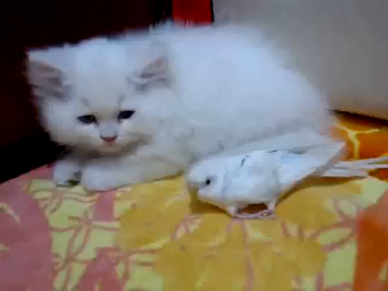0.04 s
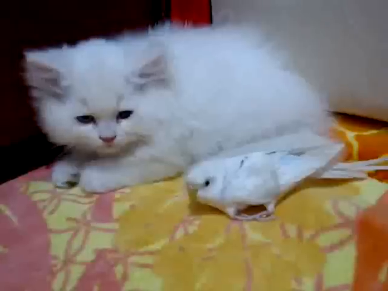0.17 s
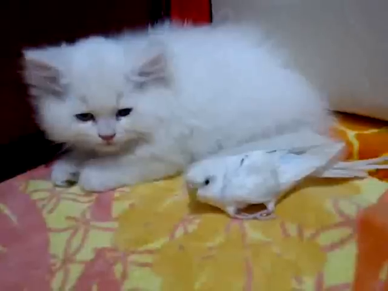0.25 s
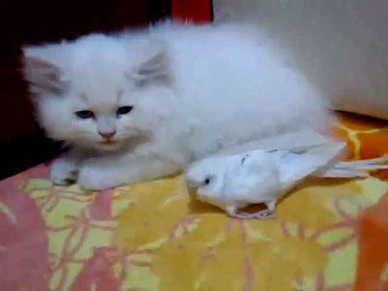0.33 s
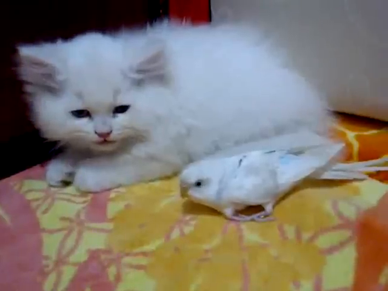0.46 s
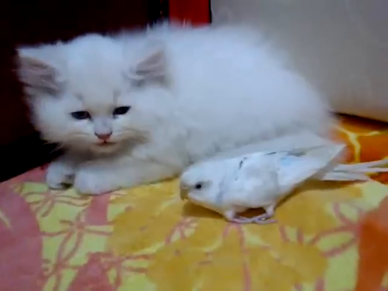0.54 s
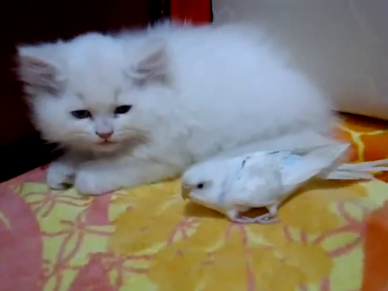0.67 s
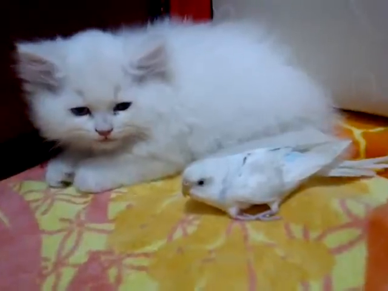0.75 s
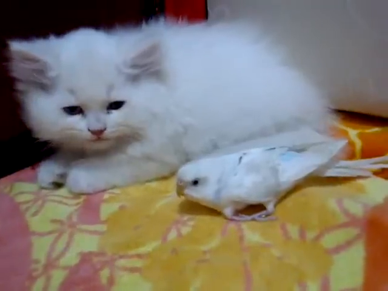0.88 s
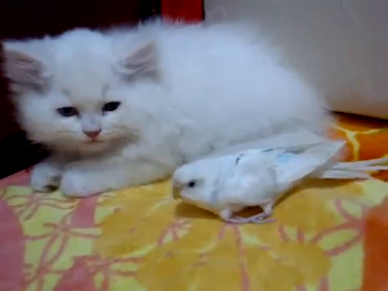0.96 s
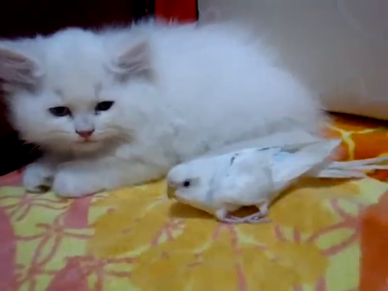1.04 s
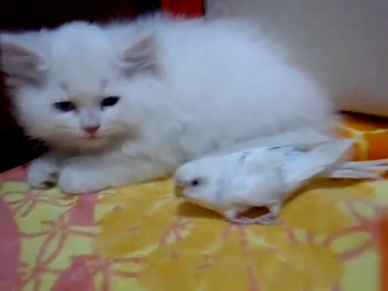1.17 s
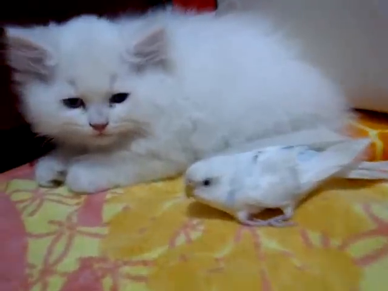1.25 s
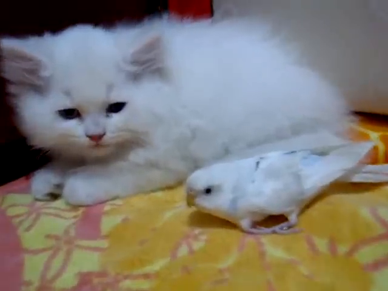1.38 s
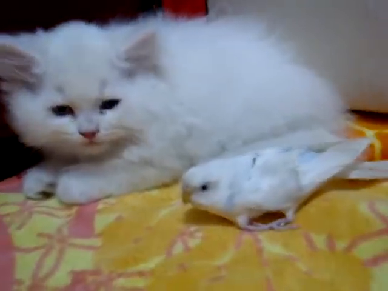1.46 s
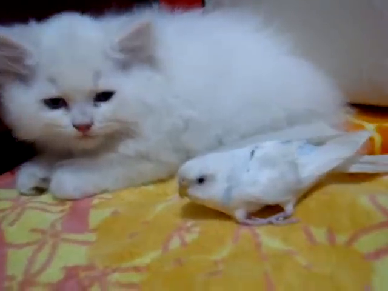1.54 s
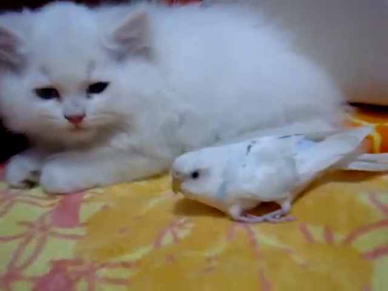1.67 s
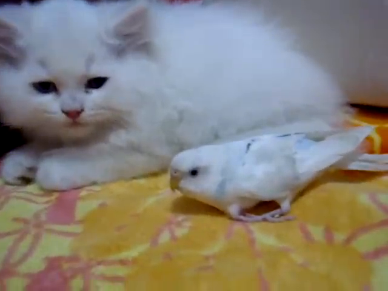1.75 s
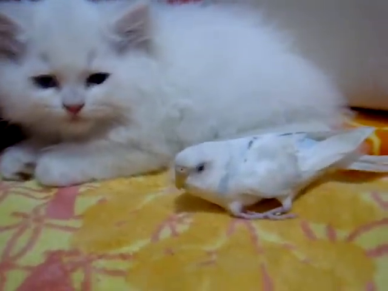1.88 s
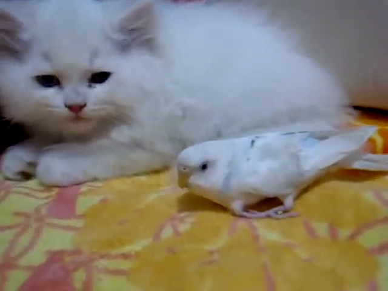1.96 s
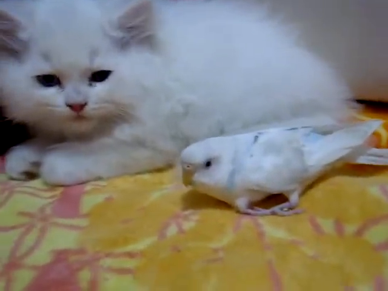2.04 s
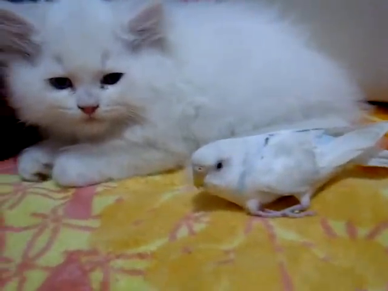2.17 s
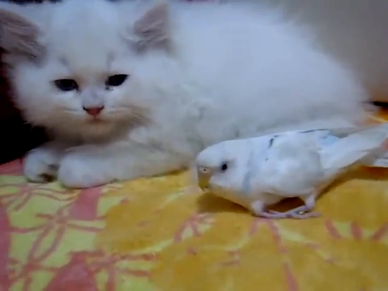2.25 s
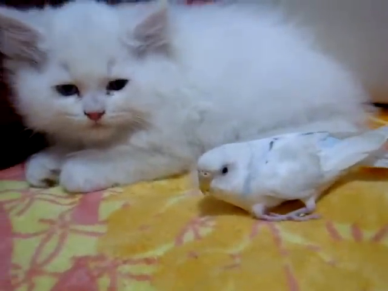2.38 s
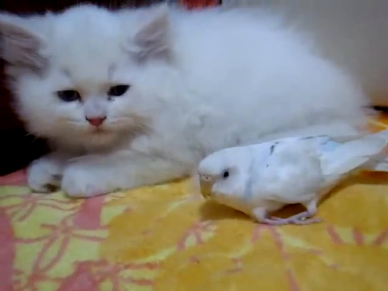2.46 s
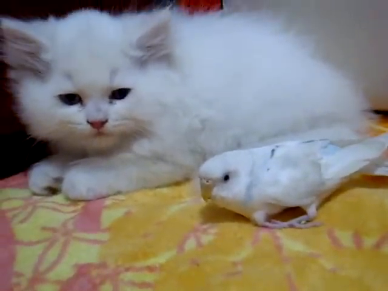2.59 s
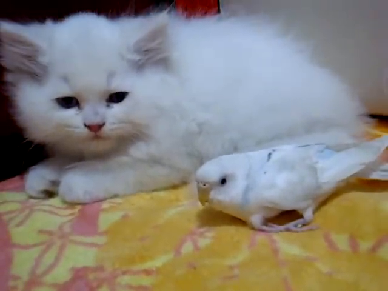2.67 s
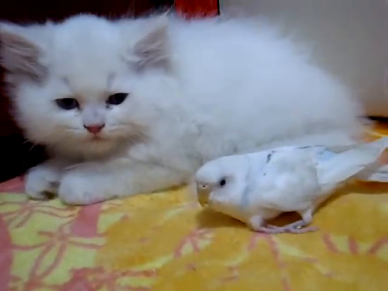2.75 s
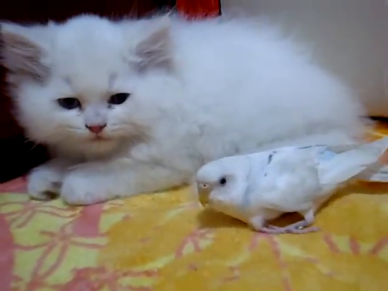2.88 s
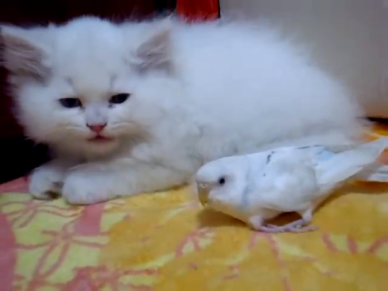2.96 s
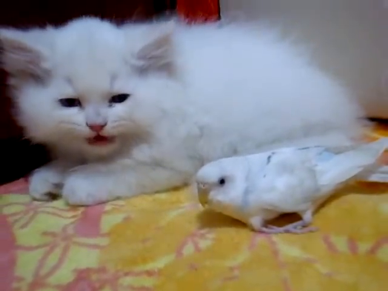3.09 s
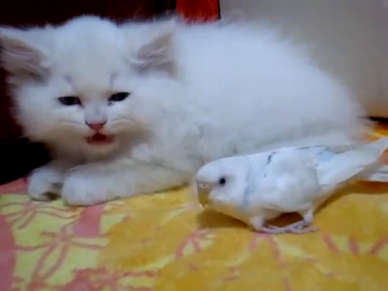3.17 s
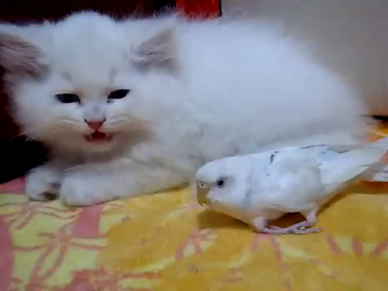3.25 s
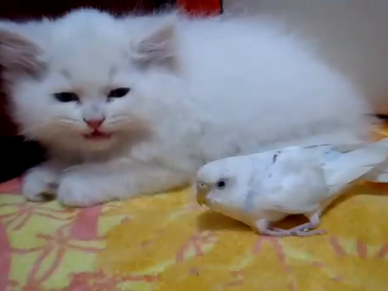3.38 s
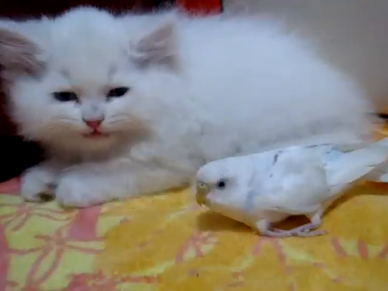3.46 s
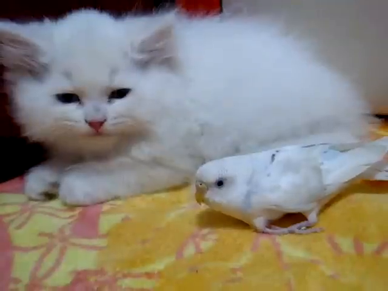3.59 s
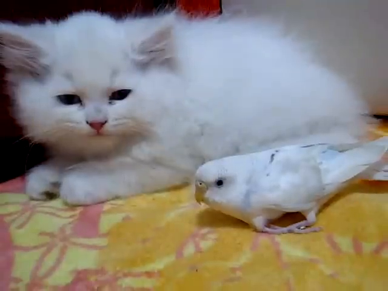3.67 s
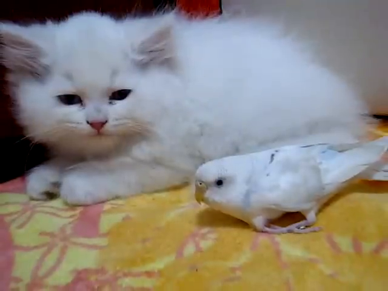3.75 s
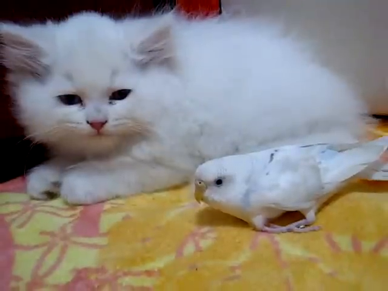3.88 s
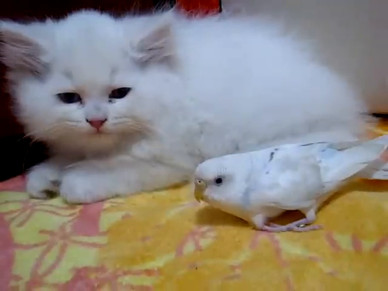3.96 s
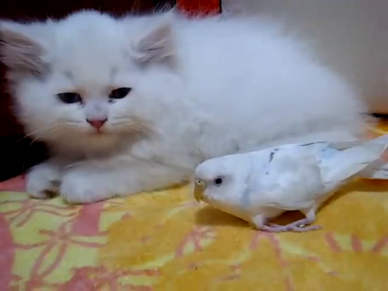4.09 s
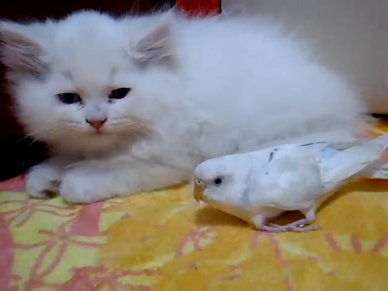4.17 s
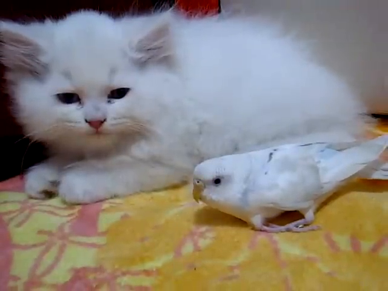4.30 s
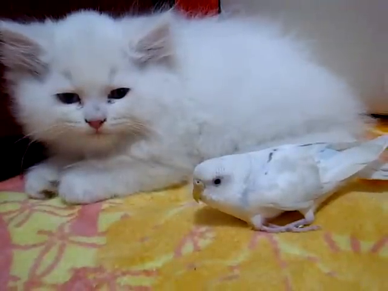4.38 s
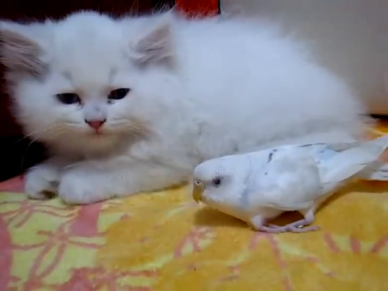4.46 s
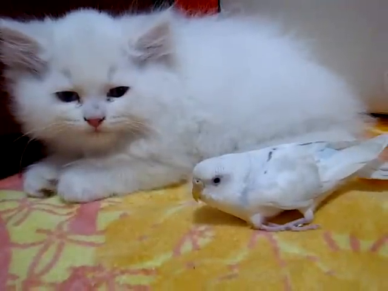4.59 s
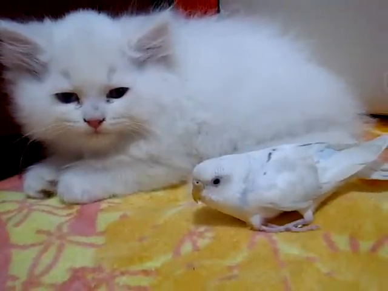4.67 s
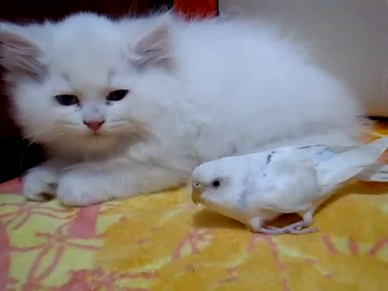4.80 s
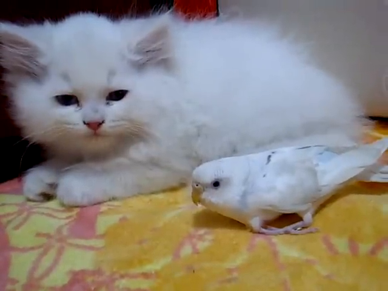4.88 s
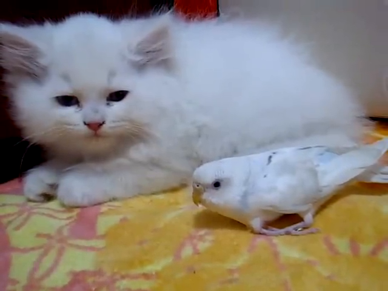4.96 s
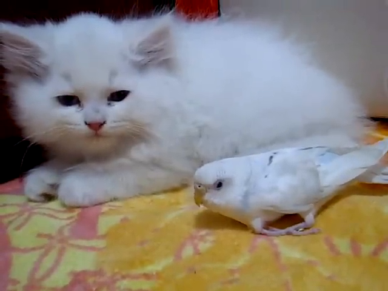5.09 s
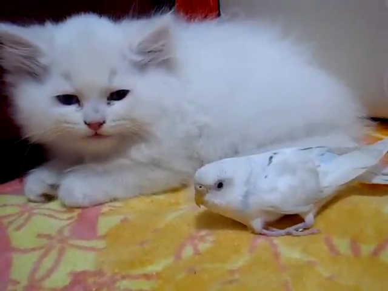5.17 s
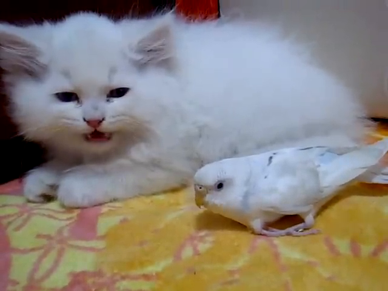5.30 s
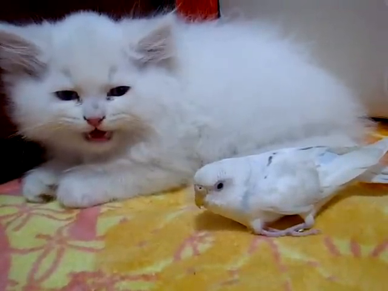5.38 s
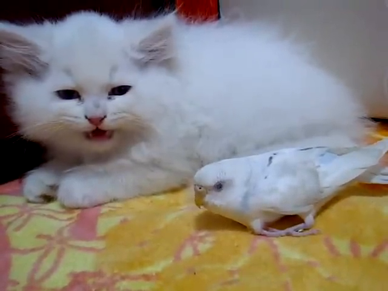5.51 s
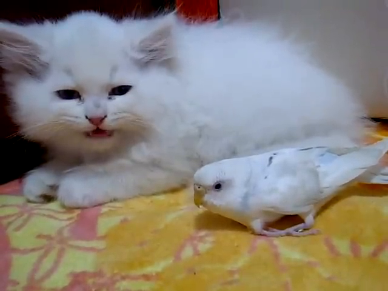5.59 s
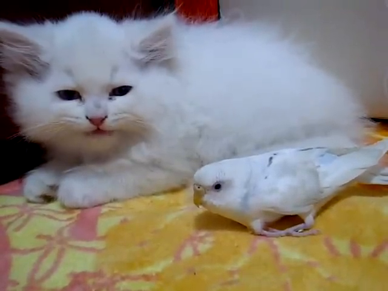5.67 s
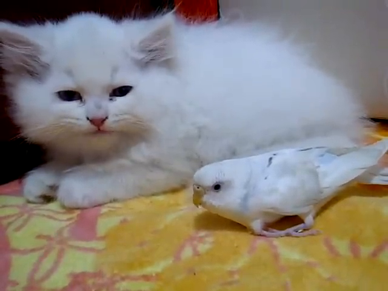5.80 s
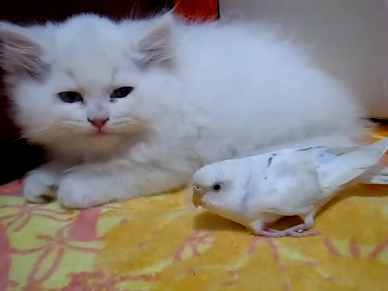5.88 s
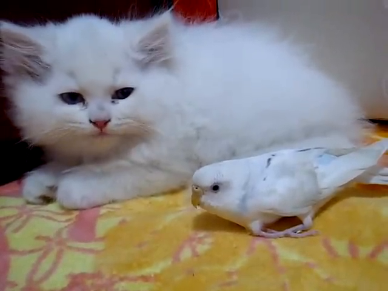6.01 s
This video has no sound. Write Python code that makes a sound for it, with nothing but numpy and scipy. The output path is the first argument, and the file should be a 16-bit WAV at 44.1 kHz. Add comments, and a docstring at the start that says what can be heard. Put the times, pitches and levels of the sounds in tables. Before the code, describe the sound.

Silence until 0.16 s, when the microphone switches on with a loud, clipped double-snap pop. From there a low room rumble, soft hiss, unsteady hum and very faint high whine continue to the end. At 0.47-0.99 s a kitten gives a weak, quivering mew, nearly a pure tone around 1 kHz, sagging in pitch at its close. Soft cloth rustle begins near 1.1 s; small plastic ticks cluster at 1.2-1.6 s, then sharper ones at 1.8-2.1 s, with a strong dull knock at 1.97 s and a bright ringing click at 2.08 s. Rustling fades, with tiny ticks at 2.4 s. A hard, loud knock lands at 2.88 s, then a small double tick at 3.05 s. A firmer mew runs 3.1-3.67 s, scooping up quickly, then falling. Quiet room follows until the last, strongest mew at 5.37-5.89 s, falling steeply. Close, boxy sound with little room tail.

```python
"""A microphone switches on with a pop: two snaps, one big swing and a decaying offset, clipped at the input.
A kitten then gives three falling mews: trembling, nearly pure tones with weak overtones.
Between the first two, cloth rustles (shaped noise) and fingers tick and knock on a camera's case (damped case
modes, single damped blows), with short noise bursts close to some knocks.
Throughout lie room rumble and hiss (shaped noise), unsteady hum tones and a comb of faint whine lines."""
import sys
import numpy as np
from scipy import signal
from scipy.fft import rfft, irfft
from scipy.io import wavfile
from scipy.ndimage import uniform_filter1d

SR = 44100
rng = np.random.default_rng(int(sys.argv[2]) if len(sys.argv) > 2 else 0)


def log_audio(samples):
    """Write samples as a 16-bit WAV file to the path given in sys.argv[1]."""
    # one column per channel
    frames = np.atleast_2d(samples).T
    # limit to full scale, then quantise
    limited = np.clip(frames, -1, 1)
    pcm = np.round(limited * 32767).astype(np.int16)
    wavfile.write(sys.argv[1], SR, pcm)


N = 266319
T = np.arange(N) / SR
SWITCH_ON_S = 0.158


def gain_of(db):
    """Decibels to amplitude."""
    return 10 ** (np.asarray(db) / 20)


def evened(x):
    """Scales to an rms of one."""
    return x / np.sqrt(np.mean(np.abs(x) ** 2) + 1e-20)


def add(mix, start_s, sound):
    """Mixes a sound in at start_s, cut at the end of the mix."""
    part = mix[round(start_s * SR):][:len(sound)]
    part += sound[:len(part)]


def noise(points):
    """Gaussian noise of unit rms, its spectrum interpolated over log frequency from (f/Hz, level/dB) points."""
    hz, db = np.transpose(points)
    bin_hz = np.fft.rfftfreq(N, 1 / SR)
    shape_db = np.interp(np.log(bin_hz + 1), np.log(hz + 1), db)
    spectrum = rfft(rng.standard_normal(N))
    return evened(irfft(spectrum * gain_of(shape_db), N))


def drift(rate_hz):
    """Random wandering of unit rms: white noise low-passed at about rate_hz."""
    hz = np.fft.rfftfreq(N, 1 / SR)
    spectrum = rfft(rng.standard_normal(N))
    return evened(irfft(spectrum / (1 + (hz / rate_hz) ** 2), N))


def room(x, t60_s=0.22):
    """Short, soft tail of a furnished room: decaying noise of unit energy after a 4 ms gap."""
    t = np.arange(SR // 2) / SR
    tail = rng.standard_normal(len(t)) * gain_of(-60 * t / t60_s) * (t > 0.004)
    return signal.fftconvolve(x, tail / np.linalg.norm(tail))[:N]


def room_floor():
    """Room rumble and hiss: one shaped noise with a slowly wavering level."""
    # rumble and hiss spectrum: f/Hz, density/dB per Hz
    floor_colour = [(15, -17.5), (45, -5), (70, -9.5), (110, -5.5), (170, -2), (300, -3), (550, -5.5),
                    (900, -8), (1400, -12.5), (2000, -16), (3000, -20.5), (4300, -17.5), (7000, -18),
                    (9000, -24.5)]
    floor_db, waver_db = -58.96, 0.59
    return gain_of(floor_db) * noise(floor_colour) * gain_of(waver_db * drift(5.6))


def hum():
    """Steady room tones whose amplitude and phase waver through a complex random factor."""
    # tones: f/Hz, rms level/dB, unsteadiness/share of the tone
    tones = [(100.2, -70, 0.44), (152.3, -69, 0.86), (788, -77.5, 0.94)]
    out = np.zeros(N)
    for hz, db, unsteady in tones:
        waver = 1 + unsteady * (drift(4) + 1j * drift(8.8))
        carrier = np.exp(2j * np.pi * hz * T)
        out += gain_of(db) * evened((waver * carrier).real)
    return out


def whine():
    """Faint electronic whine: equal high harmonics of one low pitch, in random phase."""
    base_hz, line_rms_db = 268.1, -85.5
    lines = np.zeros(N)
    for order in range(15, 27):
        cycles = order * base_hz * T + rng.random()
        lines += np.sqrt(2) * np.sin(2 * np.pi * cycles)
    return gain_of(line_rms_db) * lines


def rustle(grain_db=0.5):
    """Soft, grainy rustle of cloth: shaped noise whose level rises and falls linearly in dB."""
    # cloth spectrum: f/Hz, density/dB per Hz
    cloth_colour = [(100, -16), (700, 2), (1400, -1), (2400, -2), (3500, -7.5), (8000, -18.5)]
    # shifts of the camera: peak t/s, peak level/dB, rise/s per 20 dB, fade/s per 20 dB
    shifts = [(1.14, -62.5, 0.088, 0.12), (2.0, -60.5, 0.15, 0.45)]
    level = np.zeros(N)
    for peak_s, db, rise_s, fade_s in shifts:
        distance = np.maximum((peak_s - T) / rise_s, (T - peak_s) / fade_s)
        level += gain_of(db - 20 * distance)
    return noise(cloth_colour) * level * gain_of(grain_db * drift(80))


def switch_pop(swing_at_s=0.16166, swing_db=-3.0, swing_hz=462,
               rebound_db=-19.5, rebound_s=0.0018, rebound_width_s=0.0011,
               offset_db=-50, settle_s=0.05, snap_db=-18, snap_decay_s=0.00023):
    """The microphone wakes: two decaying snaps around a large swing, a rebound, an offset creeping to zero."""
    t = T - swing_at_s
    snaps = np.zeros(N)
    for at_s in (SWITCH_ON_S, swing_at_s + 0.0007):
        snaps += (T > at_s) * np.exp(-abs(T - at_s) / snap_decay_s)
    u = (np.pi * swing_hz * t) ** 2
    swing = (2 * u - 1) * np.exp(-u)
    rebound = np.exp(-((t - rebound_s) / rebound_width_s) ** 2)
    offset = (t > 0) * np.exp(-abs(t) / settle_s)
    upward = gain_of(snap_db) * snaps + gain_of(swing_db) * swing
    return upward - gain_of(rebound_db) * rebound - gain_of(offset_db) * offset


def noise_bursts():
    """Brief gated noise bursts close to some knocks, each with one dull and one bright part."""
    # bursts: start t/s, length/s, dull level/dB, bright level/dB, fall by the end/dB (negative = rise)
    bursts = [(1.972, 0.0199, -48.5, -47, -3.5), (2.077, 0.026, -49.5, -61, 12),
              (2.877, 0.026, -39, -59, 6.5)]
    # dull part: f/Hz, density/dB per Hz
    dull_colour = [(60, 0), (200, 7), (900, -4), (2400, -1.5), (3300, -12), (7000, -16), (9000, -46)]
    # bright part: f/Hz, density/dB per Hz
    bright_colour = [(500, -37), (3600, -18), (4300, 2.5), (4700, -16), (5300, 3.5), (5800, -11),
                     (6300, -11), (9000, -20)]
    out, dull, bright = np.zeros(N), noise(dull_colour), noise(bright_colour)
    for start_s, length_s, dull_db, bright_db, fall_db in bursts:
        u = np.clip((T - start_s) / length_s, 0, 1)
        gate = np.minimum(1, 10 * np.minimum(u, 1 - u))
        burst = gain_of(dull_db) * dull + gain_of(bright_db) * bright
        out += gate * gain_of(-fall_db * u) * burst
    return out


def bass_roll_off(x, corner_hz, damping):
    """The microphone cannot hold a steady push: a second-order high-pass makes every push swing back."""
    w = 2 * np.pi * corner_hz
    return signal.lfilter(*signal.bilinear([1, 0, 0], [1, damping * w, w * w], SR), x)


def knocks():
    """Blows reaching the microphone through the case: damped sines, bass-limited so that they swing back."""
    # blows: t/s, peak level/dB, blow f/Hz, damping/per radian, swing-back f/Hz
    blows = [(1.4053, -38, 400, 0.52, 205), (1.8560, -46, 150, 0.82, 180), (1.8591, -39.5, 129, 0.28, 179),
             (1.9664, -17.5, 490, 0.96, 175), (2.0790, -40, 1810, 0.093, 205),
             (2.079, -28, 3860, 0.048, 205), (2.0873, -43.5, 348, 0.3, 205), (2.8811, -20, 604, 0.92, 330),
             (2.8813, -9, 1960, 0.32, 266)]
    out, t = np.zeros(N), np.arange(SR // 20) / SR
    for start_s, peak_db, blow_hz, loss, mount_hz in blows:
        angle = 2 * np.pi * blow_hz * t
        blow = np.sin(angle) * np.exp(-loss * angle)
        push = bass_roll_off(blow, mount_hz, damping=0.85)
        add(out, start_s, -gain_of(peak_db) * push / abs(push).max())
    return out


def ticks(lag_s=0.00025, room_db=-15, low_hz=2500):
    """Each tick rings the plastic case's modes for milliseconds; the small shell gives off little bass."""
    # taps: t/s, peak level/dB, pitch/factor on the modes
    taps = [(1.207, -45, 0.85), (1.378, -28.5, 0.96), (1.403, -35.5, 0.9), (1.440, -34, 0.97),
            (1.4614, -31, 0.91), (1.527, -39, 0.73), (1.568, -32, 0.89), (1.8256, -25.5, 0.97),
            (1.861, -34.5, 0.91), (1.886, -36, 0.82), (1.902, -42, 1), (1.966, -18.5, 0.87),
            (2.0786, -32, 1), (2.158, -45, 0.48), (2.407, -42, 0.88), (2.4145, -38.5, 0.88),
            (3.045, -37, 1.03), (3.048, -39, 0.97)]
    # modes of the plastic case: f/Hz, relative level/dB, t60/s
    case_modes = [(2680, -10, 0.01), (3430, -1.5, 0.006), (4360, 3.5, 0.0058), (4930, 5.5, 0.0087),
                  (5700, 8, 0.006), (6340, -2.5, 0.016)]
    out, t = np.zeros(N), np.arange(SR // 20) / SR
    for start_s, peak_db, pitch in taps:
        tick = np.zeros(len(t))
        for hz, mode_db, t60_s in case_modes:
            tick += gain_of(mode_db - 60 * t / t60_s) * np.sin(2 * np.pi * hz * pitch * t)
        tick = signal.lfilter(*signal.butter(4, low_hz * pitch, "high", fs=SR), tick)
        add(out, start_s + lag_s, gain_of(peak_db) * tick / abs(tick).max())
    return out + gain_of(room_db) * room(out, t60_s=0.11)


def mew(start_s, length_s, db, base_hz, scoop_hz, scoop_s, fall_hz, lateness, break_s, jump_hz, flick,
        octave_db, octave_change_db, third_db, release_s, tuning, tremble, shimmer_db=0.54):
    """A trembling tone with weak overtones: it scoops up, falls ever faster and breaks upward once."""
    # fundamental's gain as it glides through the resonances: f/Hz (before tuning), gain/dB
    voice_colour = [(800, -4), (850, -2.5), (890, 0), (935, -0.5), (972, -5), (1020, -3), (1070, -4),
                    (1120, -6)]
    break_width_s, flick_s, attack_s = 0.011, 0.01196, 0.009
    push_db, push_s = 2, 0.03  # extra effort at the start
    sag_db = -1.3  # change of the fundamental by the end
    calming = 0.5  # share of the tremble gone by the end
    throat_hz, throat_width_hz = 2700, 150  # resonance that picks out the third harmonic
    t = np.arange(0, length_s, 1 / SR)
    u = t / length_s

    voice_break = (1 + np.tanh((start_s + t - break_s) / break_width_s)) / 2
    hz = base_hz - scoop_hz * np.exp(-t / scoop_s) - fall_hz * u ** lateness + jump_hz * voice_break
    hz = hz * (1 + flick * np.exp(-(t / flick_s) ** 2))  # the folds catch high, then settle
    flutter = drift(75)
    flutter = evened(flutter - uniform_filter1d(flutter, size=SR // 12))  # quick part only: the note holds
    hz = hz * (1 + tremble * (1 - calming * u ** 2) * flutter[:len(t)])
    phase = 2 * np.pi * np.cumsum(hz) / SR

    colour_db = np.interp(hz / tuning, *np.transpose(voice_colour))
    fundamental = gain_of(colour_db + sag_db * u) * np.sin(phase)
    octave = gain_of(octave_db + octave_change_db * u ** 2) * np.sin(2 * phase)
    throat = 1 / np.hypot(1, (3 * hz - throat_hz) / throat_width_hz)
    third = gain_of(third_db) * throat * np.sin(3 * phase)

    attack = np.minimum(t / attack_s, 1)
    release = np.sin(np.pi / 2 * np.minimum((length_s - t) / release_s, 1))
    effort_db = db + push_db * np.exp(-t / push_s) + shimmer_db * drift(72)[:len(t)]
    return (fundamental + octave + third) * attack * release * gain_of(effort_db)


def kitten():
    """Three mews with a faint room tail; the first, weakest one is the shakiest."""
    # mews: start t/s, length/s, drive level/dB, base f/Hz, scoop up/Hz, scoop time/s, fall/Hz,
    # lateness of the fall/power, voice break t/s, its jump/Hz, onset flick/share of pitch, octave/dB,
    # octave's change by the end/dB, third harmonic/dB, release/s, tuning of the resonances/factor
    mews = [(0.474, 0.516, -41.5, 1043, 42, 0.03, 251.4, 3.35, 0.833, 28.1, 0.209, -31, 0.5, -41, 0.026, 1.019),
            (3.102, 0.57, -38, 1098, 260, 0.016, 320, 3.03, 3.591, 105, 0.241, -22.5, -8.5, -34, 0.011, 1.03),
            (5.367, 0.5196, -35.5, 1072, 135, 0.032, 365, 3.65, 5.866, 173, 0.132, -23.5, -5, -47, 0.032, 0.99)]
    # pitch flutter at the start of each mew: rms/share of pitch
    trembles = [.017, .009, .0055]
    out = np.zeros(N)
    for row, tremble in zip(mews, trembles):
        add(out, row[0], mew(*row, tremble))
    return out + gain_of(-26) * room(out)


def scene():
    """Sum of all sources, silent until the microphone comes on."""
    background = room_floor() + hum() + whine()
    handling = rustle() + noise_bursts() + knocks() + ticks()
    sound = background + handling + switch_pop() + kitten()
    return (sound * (T >= SWITCH_ON_S))[None]


def record(dry):
    """The input clips on the pop; the top rolls off gently, then stops at the band limit."""
    clipped = np.clip(dry, -0.62, 0.62)
    gentle = signal.firwin(45, 7850, fs=SR)
    band_limit = signal.firwin(201, 8800, window=("kaiser", 8), fs=SR)
    soft = signal.oaconvolve(clipped, gentle[None], "same")
    return signal.oaconvolve(soft, band_limit[None], "same")


dry = scene()
out = record(dry)
log_audio(out)
```